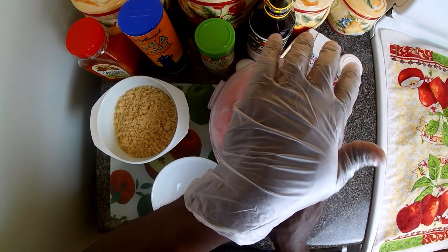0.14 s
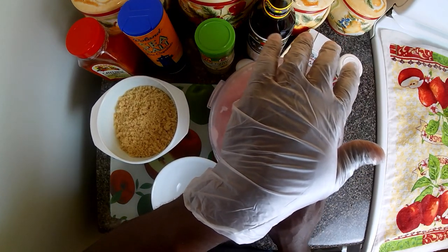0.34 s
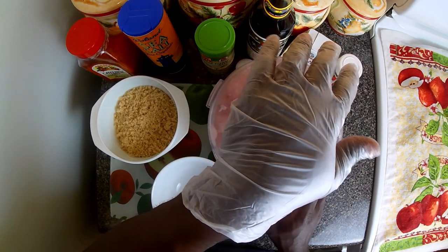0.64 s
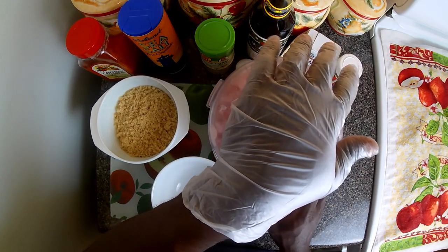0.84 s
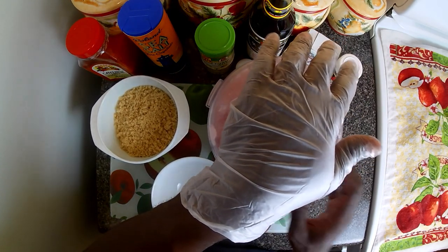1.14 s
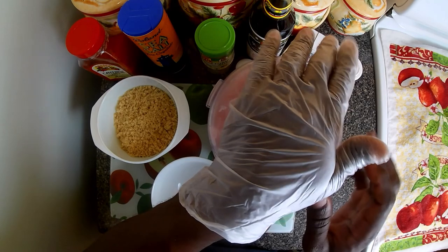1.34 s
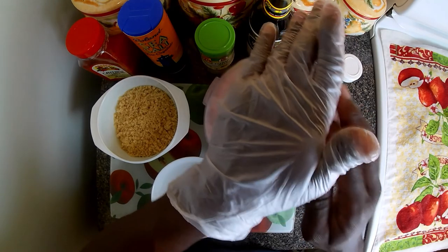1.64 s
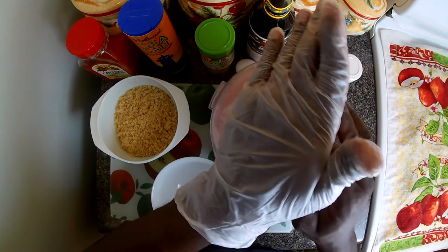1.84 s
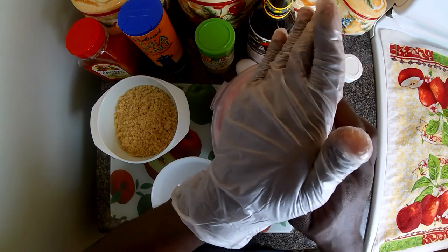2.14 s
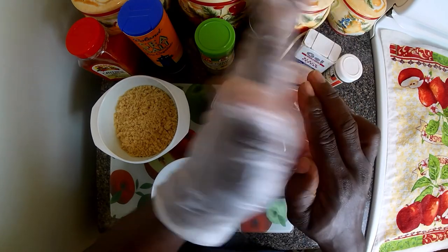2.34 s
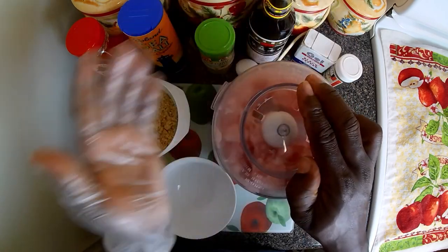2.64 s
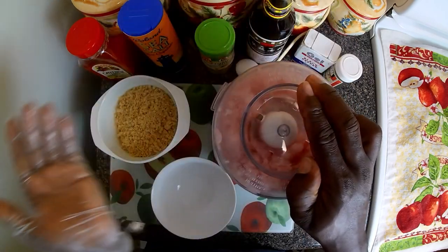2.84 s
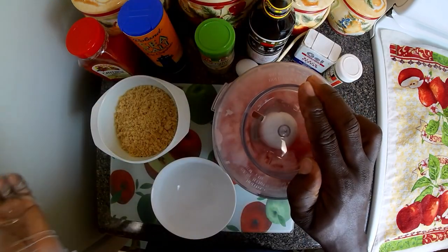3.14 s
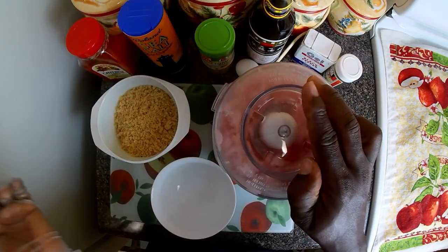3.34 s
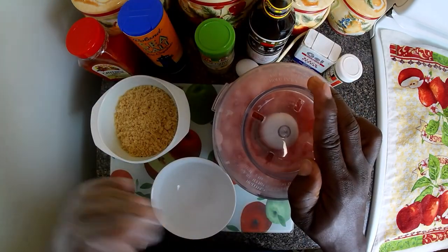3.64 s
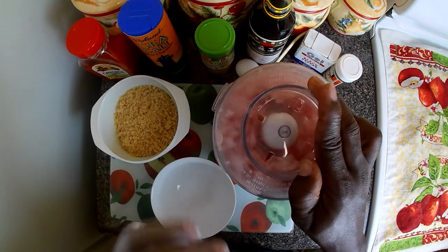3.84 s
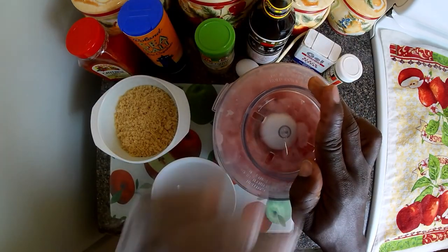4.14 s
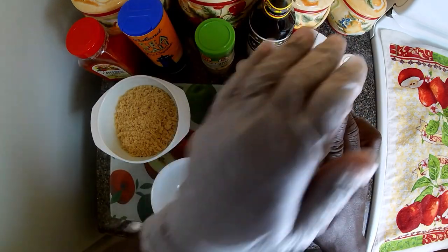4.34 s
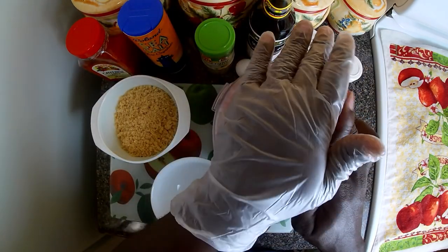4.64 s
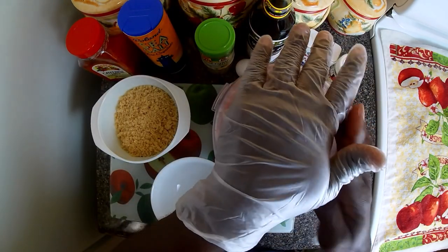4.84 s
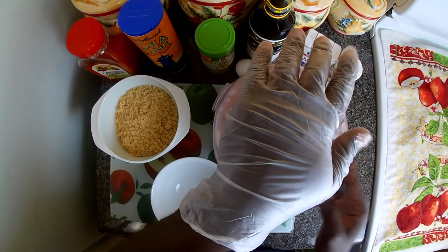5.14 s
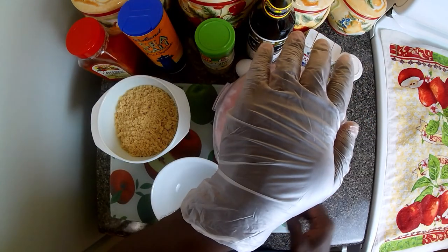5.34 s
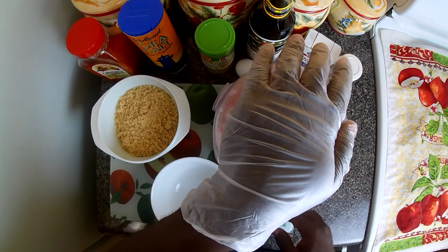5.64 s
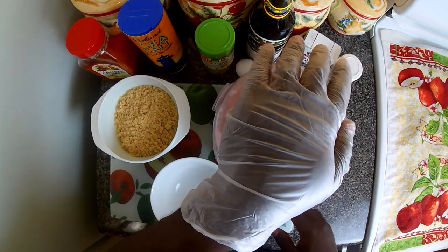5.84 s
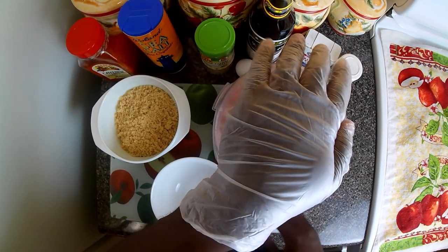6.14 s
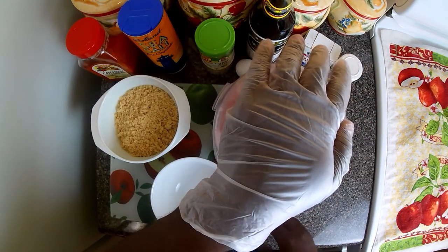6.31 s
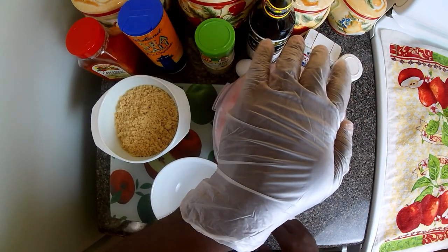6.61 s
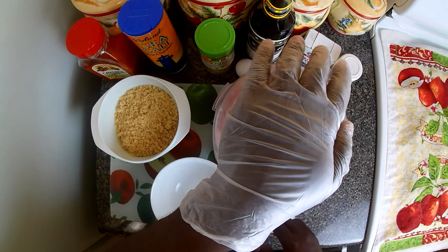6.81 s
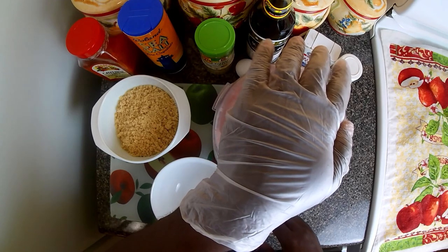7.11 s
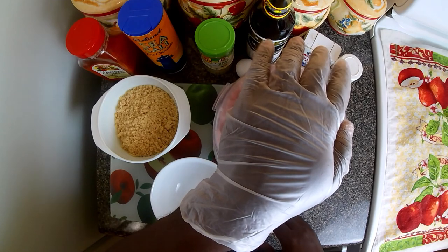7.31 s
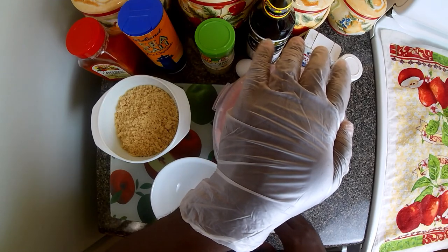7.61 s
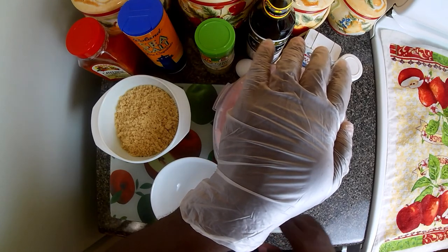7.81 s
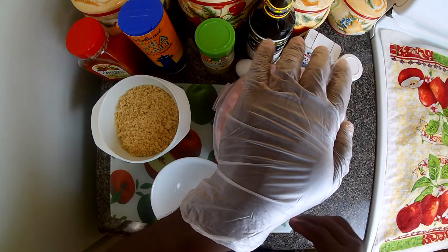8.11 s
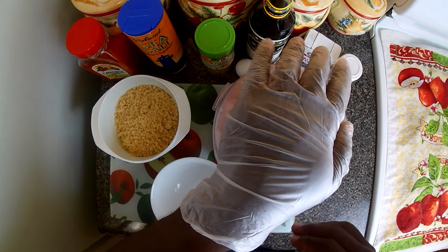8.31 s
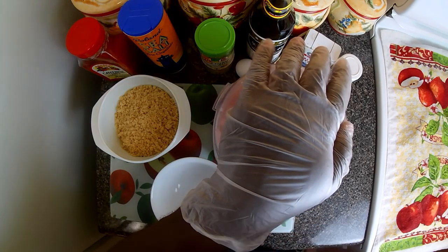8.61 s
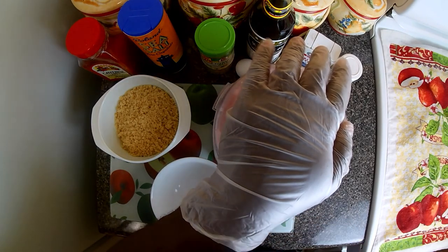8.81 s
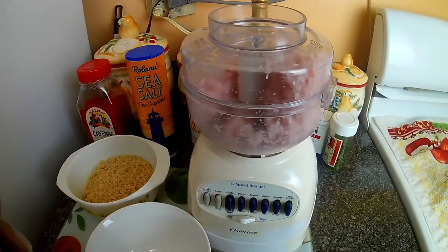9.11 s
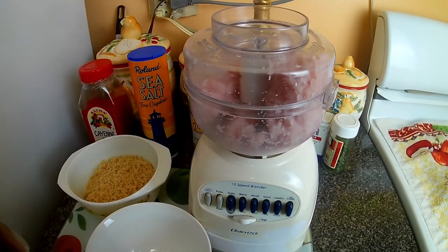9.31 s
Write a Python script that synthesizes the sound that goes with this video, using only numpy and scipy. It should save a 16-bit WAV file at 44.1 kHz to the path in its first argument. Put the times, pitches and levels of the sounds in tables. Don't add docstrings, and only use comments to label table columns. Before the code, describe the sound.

From 0 s a blender is already running, close and loud: a low motor drone near 100 Hz, mains hum, a mid-high gear whine and dense wet churning of raw fish in a resonant plastic bowl. Irregular lumps knock the wall throughout, a strong one at 1.4 s, and brief nasal drags make the bowl sing. Around 1.3-2.5 s the hand eases, the lid buzzes and the drone dips. From about 2.5 to 4.7 s the lid is uncovered, so the whine and upper harmonics stand out brighter, strongest near 3.1 s. Buzzes at 4.6 and 4.9 s mark the hand pressing back. From 5.2 s the motor bogs down, slower, its whine lower and rougher, fluttering unsteadily, with heavier knocks near 7.7-8 s. At 8.8 s it cuts off instantly; after a tiny silence, a faint kitchen tone with refrigerator hum fades in quickly.

```python
import sys
import numpy as np
from scipy import signal
from scipy.fft import rfft, irfft, next_fast_len
from scipy.io import wavfile
from scipy.ndimage import uniform_filter1d

SR = 44100
rng = np.random.default_rng(int(sys.argv[2]) if len(sys.argv) > 2 else 0)


def attenuation_scalar(level_db):
    decades = np.asarray(level_db, float) / 20
    return 10 ** decades


def materialize(psi):
    bounded = np.clip(np.atleast_2d(psi).T, -1, 1)
    quanta = np.round(bounded * 32767).astype(np.int16)
    wavfile.write(sys.argv[1], SR, quanta)


N = 417186
T = np.arange(N) / SR

# hz, level_db_per_hz
KITCHEN_SPECTRUM = [(12, -38), (20, -10), (75, -19), (109, -22), (149, -3), (182, -9.5), (304, -9),
                    (408, -15), (439, -14), (534, -12.5), (1770, -37.5), (7000, -60), (9100, -74),
                    (15400, -120)]
# hz, level_db
FRIDGE_TONES = [(118.4, -57), (150.7, -57), (301.5, -69), (441.4, -62.5)]
# time_s, peak_db
LUMP_KNOCKS = [(0.071, -13), (0.283, -8), (0.332, -12.5), (0.845, -11.5), (0.979, -13), (1.134, -13),
               (1.317, -16), (1.431, -2.5), (1.618, -9), (1.884, -8), (2.084, -11), (2.305, -6.5),
               (2.417, -12), (2.779, -16), (3.001, -16), (3.182, -15), (3.702, -15), (3.732, -13),
               (4.112, -12), (4.434, -10), (4.6, -10), (4.778, -12), (4.907, -16), (5.206, -17),
               (5.345, -10), (5.72, -19), (6.423, -13), (6.913, -15), (7.078, -14), (7.182, -16),
               (7.535, -13), (7.735, -8), (7.949, -6), (8.217, -10), (8.451, -10), (8.702, -15),
               (8.78, -15)]
# time_s, half_length_s, level_db
BOWL_SINGS = [(0.076, .04, -30), (0.34, .04, -27.5), (0.977, .05, -25.5), (1.654, .07, -24.5),
              (1.747, 0.048, -28), (2.093, 0.031, -27), (2.44, .08, -25.5), (2.829, 0.041, -28.5),
              (3.223, 0.086, -28), (3.557, 0.043, -22.5), (3.737, .035, -23), (3.8, 0.046, -25.5),
              (4.02, 0.045, -30), (4.127, 0.046, -28.5), (4.232, 0.035, -23), (4.311, .045, -25.5),
              (4.592, 0.05, -25), (4.992, .13, -25.5), (5.13, 0.033, -27), (6.603, 0.12, -32),
              (7.218, .07, -27.5), (7.545, 0.041, -27.5), (7.983, 0.086, -26.5), (8.262, .08, -27.5),
              (8.797, 0.035, -29.5)]
# hz, width_hz, level_db
BOWL_MODES = [(358.4, 37.6, -7), (442.7, 27.6, -7), (620.5, 70, -10.5), (859.8, 36.8, -2.5),
              (773, 84, -9.5), (895, 50.5, -6.5), (1055, 109, -6.5), (1308, 67, -12.5), (1448, 43.5, -9),
              (1559, 77, -11), (2144, 73, -23.5), (2716, 60, -24.5), (2930, 130, -31), (3704, 150, -30.5),
              (5930, 730, -40.5)]
# hz, level_db_per_hz
CHURN_SPECTRUM = [(12, -49), (35, -29), (80, -25.5), (130, -10.5), (230, -18), (320, -10.5), (520, -14.5),
                  (1200, -15.5), (1800, -17.5), (2400, -28), (3100, -30.5), (4250, -33), (5000, -33),
                  (5500, -39), (6300, -40), (6700, -58), (7000, -46.5),]
# level_db, then change_db for weight off, lid uncovered, bogged down
MESH_LAWS = [(-41.5, 4.5, 3.5, 8.5), (-51, -3, 13.5, .5), (-48, -12.5, 10.5, -2), (-72, 5, -4, 17)]
MESH_WIDTHS_HZ = [18, 65, 115, 170]
# time_s, shaft_hz
SHAFT_SPEED = [(0, 105), (.15, 107), (.35, 101.5), (.6, 108.3), (.95, 102.5), (1.45, 104.5), (1.8, 108.5),
               (2.3, 101), (2.47, 106.5), (2.85, 102), (3.2, 109.5), (3.45, 105), (4.5, 107), (4.8, 104),
               (5.15, 105.5), (5.4, 98.5), (6.9, 98), (8.82, 100)]
# time_s, weight_off_0_1, uncovered_0_1
LID_HAND = [(0, .02, .02), (1.2, .05, .02), (1.6, .45, .05), (2.0, .9, .05), (2.4, .95, .2),
            (2.6, .95, 1.05), (2.76, .95, .8), (2.85, .9, .3), (3.05, .95, .75), (3.12, .95, 1.45),
            (3.2, .95, .8), (3.45, .9, .5), (3.9, .95, .8), (4.58, .95, .85), (4.8, .4, .05),
            (5.2, .05, .02)]
# order_in_quarter_shaft_rates, level_db
BLADE_ORDERS = [(1, -55), (13.6, -42), (15, -39)]
# level_db, then change_db for weight off, lid uncovered, bogged down
SECOND_LAW = (-51, 5.5, 0, -3)
# level_db, then the same three changes in db
HUM_LAW = (-46, 1, 6, 1.5)
# level_db, then the same three changes in db
FIFTH_LAW = (-54, -3.3, 0.1, 9)
# time_s, level_db
BLADE_GRIP = [(0, -31), (1.4, -31.5), (1.6, -29.5), (2.75, -30.5), (2.9, -32.5), (3.3, -32.5), (3.5, -36),
              (4.9, -35.5), (5.3, -31.5), (6.7, -31.5), (7.6, -33), (8.0, -30.5), (8.8, -35.5)]
# time_s, half_length_s, gain_db
LID_BUZZES = [(1.3, .12, 13), (2.55, 0.16, 3), (3.05, .08, 7), (4.595, .12, 12), (4.884, .12, 12)]
# time_s, half_length_s, gain_db
BASE_ROCKS = [(.19, .08, 3), (.39, .1, -2.5), (.59, .1, 2.5), (1.5, 0.14, -13), (1.85, 0.18, 2),
              (2.3, 0.094, -9), (2.65, .08, 4), (2.87, .1, -8), (3.06, .06, -10.5), (3.21, .1, 2.5),
              (4.4, 0.27, 1.5), (4.8, .08, -3), (5.17, 0.066, 3), (5.9, .12, -7.5), (6.07, .08, 4.5),
              (8.72, .1, 3)]
# hz, level_db_per_hz
HISS_SPECTRUM = [(6900, -10.5), (7250, 2), (7450, -9.5), (7560, 2.5), (7900, -5), (8300, 0.5), (10000, 1),
                 (11000, -2), (15700, -3.5)]
# hz, threshold_db
GATE_THRESHOLD = [(2200, -13), (2900, -6.5), (3500, -5), (4300, -1), (4800, -3), (5500, 1), (6300, 1),
                  (6900, 4), (7800, 5), (8500, 3.7), (11000, 3.2), (16000, 2.2)]
GAPS_HZ = [6710, 7470, 12000]
DROPOUTS_S = [.012, .99, 2.763, 3.085, 3.126, 3.702, 3.96, 5.924, 6.711, 9.272]

CUT_S, FADE_IN_S = 8.8232, 8.968
KITCHEN_DB = -52
KNOCK_DB = 33
SING_HZ, SING_SPREAD_HZ = 857, 12
CHURN_DB, SURGE_DB, SURGE_HZ = -22, 0.44, 5.7
THICK_DB = -0.8
DULLING, SHIMMER_DB, UNCOVERED_DB, BOGGED_DB = 1.1, 0.88, 0.8, 0.1
MESH_HZ, MESH_RISE_HZ, MESH_SAG_HZ, MESH_PER_SHAFT_HZ = 1652, 22, 90, 4
SHAKE, SHAKE_BOGGED = .004, .018
BOG_S, BOG_RAMP_S = 5.2, .15
HUNT_HZ, HUNT_RATE_HZ = 1.3, 3
UNBALANCE_DB, UNBALANCE_DB_PER_HZ = -39.3, .85
BEAT_DB = 3.0
TOP, START_STEP = 1.1, .1


def rms_one(x):
    return x / np.sqrt(np.mean(x ** 2) + 1e-20)


def in_time(rows):
    s, *columns = np.transpose(rows)
    return [np.interp(T, s, c) for c in columns]


def bumps_db(events):
    return sum(db * np.clip(2 - 2 * np.abs(T - s) / half_s, 0, 1) for s, half_s, db in events)


def drift(rate_hz):
    r = np.exp(-2 * np.pi * 16 * rate_hz / SR)
    noise = rng.standard_normal(N // 16 + 5002)
    slow = signal.lfilter([1], [1, -2 * r, r * r], noise)[5000:]
    return np.interp(np.arange(N) / 16, np.arange(len(slow)), rms_one(slow))


def coloured(x, spectrum):
    size = next_fast_len(N)
    hz = np.maximum(np.arange(size // 2 + 1) * SR / size, 1)
    last_hz, last_db = spectrum[-1]
    points = np.array(spectrum + [(last_hz * 1.15, last_db - 30), (SR / 2, -120)])
    gain_db = np.interp(np.log(hz), np.log(points[:, 0]), points[:, 1])
    return irfft(rfft(x, size) * attenuation_scalar(gain_db), size)[:N]


def resonance(x, hz, width_hz):
    r = np.exp(-np.pi * width_hz / SR)
    zeros = np.array([1, 0, -1]) * (1 - r * r) / 2
    return signal.lfilter(zeros, [1, -2 * r * np.cos(2 * np.pi * hz / SR), r * r], x)


def butter(x, hz, kind, order=2):
    return signal.sosfilt(signal.butter(order, hz, kind, fs=SR, output="sos"), x)


def shaky_line(hz, width_hz, rough):
    phase = 2 * np.pi * (np.cumsum(hz) / SR + rng.random())
    rough = np.clip(rough, 0, 1)
    in_phase = np.sqrt(2 * (1 - rough)) + np.sqrt(rough) * drift(width_hz)
    return in_phase * np.sin(phase) + np.sqrt(rough) * drift(width_hz) * np.cos(phase)


def controls():
    return (*in_time(LID_HAND), np.clip((T - BOG_S) / BOG_RAMP_S, 0, 1))


def tone_db(law, wander_db, wander_hz):
    change_db = sum(db * c for db, c in zip(law[1:], controls()))
    return law[0] + change_db + wander_db * drift(wander_hz)


def thin_treble(x):
    hz, s, parts = signal.stft(x, SR, "cosine", nperseg=1880)
    power = np.abs(parts) ** 2 + 1e-20
    usual_db = uniform_filter1d(10 * np.log10(power.mean(axis=1)), size=40)
    loud_db = 10 * np.log10(power.sum(axis=0))
    band_chance = rng.standard_normal((len(hz) // 10 + 1, len(s)))
    band_chance = np.repeat(band_chance, 10, axis=0)[:len(hz)]
    gate_db = (usual_db + np.interp(hz, *np.transpose(GATE_THRESHOLD), left=-200))[:, None]
    gate_db = gate_db + 1.9 * band_chance + .5 * rng.standard_normal(len(s))
    gate_db = gate_db + .3 * (loud_db - np.median(loud_db))
    gate_db = gate_db + 30 * sum(np.abs(hz - gap_hz) < 24 for gap_hz in GAPS_HZ)[:, None]
    keep = (power > attenuation_scalar(2 * gate_db)) | (s > CUT_S - .012)
    return signal.istft(parts * keep, SR, "cosine", nperseg=1880)[1][:N]


def kitchen():
    tone = attenuation_scalar(KITCHEN_DB + 0.5) * rms_one(coloured(rng.standard_normal(N), KITCHEN_SPECTRUM))
    fridge = sum(attenuation_scalar(db) * shaky_line(np.full(N, hz), width_hz=7, rough=.4) for hz, db in FRIDGE_TONES)
    return tone + fridge


def knocks():
    s, db = np.transpose(LUMP_KNOCKS)
    out, chance_db = 0, rng.standard_normal((len(s), 3))
    modes = [(855, 42, 6.5), (1040, 140, -4.0), (1500, 120, -3.5)]  # hz, width_hz, level_db
    for k, (hz, width_hz, mode_db) in enumerate(modes):
        clicks = np.full(N, 1e-18)
        clicks[(s * SR).astype(int)] = attenuation_scalar(db + mode_db + chance_db[:, k])
        soft_clicks = butter(clicks, 900, "low", order=4)
        out = out + (-1) ** k * resonance(soft_clicks, hz, width_hz)
    return attenuation_scalar(KNOCK_DB) * out


def singing():
    swell = sum(attenuation_scalar(db) * np.cos(np.pi / 2 * np.clip((T - s) / half_s, -1, 1))
                for s, half_s, db in BOWL_SINGS)
    return swell * shaky_line(SING_HZ + SING_SPREAD_HZ * drift(9), width_hz=30, rough=.2)


def churn(shaft_hz):
    _, uncovered, bogged = controls()
    surge_db = SURGE_DB * drift(SURGE_HZ)
    bright_db = SHIMMER_DB * drift(13) - DULLING * surge_db + UNCOVERED_DB * uncovered + BOGGED_DB * bogged
    blade = np.sin(2 * np.pi * np.cumsum(shaft_hz) / 4 / SR)
    sizes = attenuation_scalar(3.73 * np.minimum(rng.exponential(1, N), 5)) * rng.choice([-1, 1], N)
    impacts = rms_one(sizes * (rng.random(N) < 900 / SR))
    drive = (rng.standard_normal(N) + 0.36 * impacts) * attenuation_scalar(0.19 * blade + 0.88 * drift(11.0))
    rings = 0
    for k, (hz, width_hz, db) in enumerate(BOWL_MODES):
        ring = resonance(resonance(drive, hz, 1.55 * width_hz), hz, 1.55 * width_hz)
        rings = rings + (-1) ** k * attenuation_scalar(db + drift(18)) * ring
    splash = rng.standard_normal(N) * attenuation_scalar(1.18 * drift(19))
    x = rings + coloured(splash + 0.26 * impacts, CHURN_SPECTRUM)
    treble = butter(x, 1800, "high")
    return attenuation_scalar(CHURN_DB + surge_db + THICK_DB * bogged) * rms_one(x + treble * (attenuation_scalar(bright_db) - 1))


def gear_whine(shaft_hz):
    _, uncovered, bogged = controls()
    mesh_hz = MESH_HZ + MESH_RISE_HZ * uncovered - MESH_SAG_HZ * bogged
    mesh_hz = mesh_hz + MESH_PER_SHAFT_HZ * (shaft_hz - 105)
    mesh_hz = mesh_hz * (1 + SHAKE * drift(12))
    smear = SHAKE_BOGGED * bogged * drift(25)
    levels_db = [tone_db(law, wander_db=1.4, wander_hz=3.1) for law in MESH_LAWS]
    out = attenuation_scalar(levels_db[0] - 3.0) * shaky_line(mesh_hz * .948, width_hz=57, rough=0.31)
    out += attenuation_scalar(levels_db[1] - 6.5) * shaky_line(2 * mesh_hz + shaft_hz, width_hz=34, rough=0.74)
    third_side_db = levels_db[2] - 8.5 + 5.7 * uncovered
    out += attenuation_scalar(third_side_db) * shaky_line(3 * mesh_hz - 1.8 * shaft_hz, width_hz=89, rough=0.69)
    for k, (db, width_hz) in enumerate(zip(levels_db, MESH_WIDTHS_HZ)):
        harmonic_hz = (k + 1) * mesh_hz * (1 + smear * min(k, 1))
        out += attenuation_scalar(db) * shaky_line(harmonic_hz, width_hz, rough=[.5, .6, .8, .88][k])
    return out


def shaft():
    return in_time(SHAFT_SPEED)[0] + HUNT_HZ * controls()[2] * drift(HUNT_RATE_HZ)


def motor(shaft_hz):
    unbalance_db = bumps_db(BASE_ROCKS) + UNBALANCE_DB + UNBALANCE_DB_PER_HZ * (shaft_hz - 105)
    second_db = tone_db(SECOND_LAW, wander_db=1.2, wander_hz=1.5) + bumps_db(LID_BUZZES)
    beat_db = BEAT_DB * controls()[2] * np.sin(np.pi / 2 * np.cumsum(shaft_hz) / SR)
    fourth_db = in_time(BLADE_GRIP)[0] + beat_db
    fifth_db = tone_db(FIFTH_LAW, wander_db=1.5, wander_hz=2.5)
    hum_db = tone_db(HUM_LAW, wander_db=1.5, wander_hz=4.1)
    out = attenuation_scalar(unbalance_db) * shaky_line(shaft_hz, width_hz=8, rough=.07)
    out += attenuation_scalar(second_db) * shaky_line(2 * shaft_hz, width_hz=5, rough=.15)
    out += attenuation_scalar(fourth_db) * shaky_line(4 * shaft_hz, width_hz=10, rough=.08)
    out += attenuation_scalar(fifth_db) * shaky_line(1.25 * shaft_hz, width_hz=5, rough=.2)
    for order, db in BLADE_ORDERS:
        out += attenuation_scalar(db) * shaky_line(order / 4 * shaft_hz, width_hz=6, rough=.5)
    return out + attenuation_scalar(hum_db) * shaky_line(np.full(N, 59.6), width_hz=16, rough=0.36)


def scene():
    shaft_hz = shaft()
    blender = motor(shaft_hz) + gear_whine(shaft_hz) + churn(shaft_hz) + knocks() + singing()
    smear = attenuation_scalar(-29) * np.clip(1 - (T - CUT_S) / .016, 0, 1)
    running = np.maximum(np.clip((CUT_S - T) / .0002, 0, 1), smear)
    fade_in = np.clip((T - FADE_IN_S) / .034, 0, 1) ** 2.2
    return (blender * running + kitchen() * fade_in)[None]


def low_pass(x):
    return signal.sosfilt(signal.butter(12, 15720, fs=SR, output="sos"), x)


def record(dry):
    flutter = attenuation_scalar(.8 * drift(40) + .4 * drift(14)) * np.clip((CUT_S - T) / .001, 0, 1)
    hiss = attenuation_scalar(-60.0) * coloured(rng.standard_normal(N), HISS_SPECTRUM) * flutter
    x = thin_treble(TOP * np.tanh(dry[0] / TOP) + hiss) + START_STEP * np.exp(-T / .0003)
    dip = np.minimum(1.3 * sum(np.exp(-((T - s) / .0065) ** 2) for s in DROPOUTS_S), 1)
    backward = butter(x[::-1], 1900, "high", order=4)
    treble = butter(backward[::-1], 1900, "high", order=4)
    noise_floor = attenuation_scalar(-94) * rng.standard_normal(N) * (T > FADE_IN_S)
    mix = x - .85 * dip * treble + noise_floor
    return low_pass(mix[None])


dry = scene()
out = record(dry)
materialize(out)
```